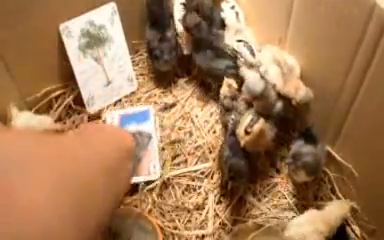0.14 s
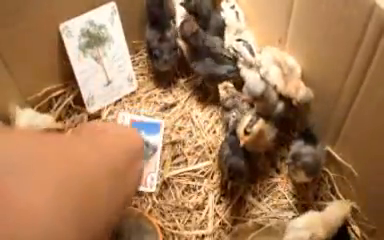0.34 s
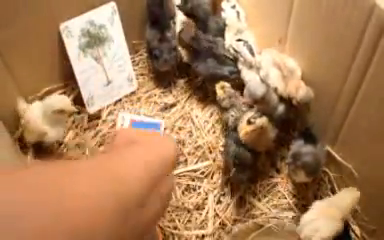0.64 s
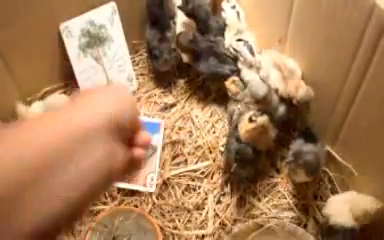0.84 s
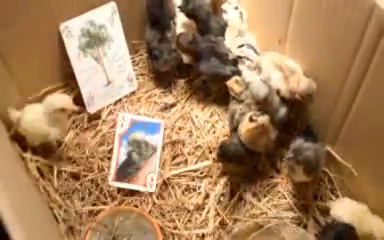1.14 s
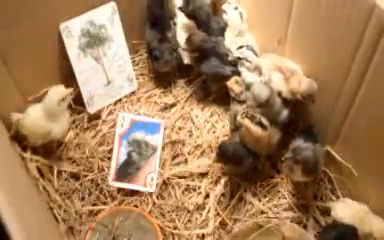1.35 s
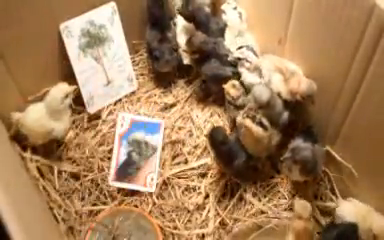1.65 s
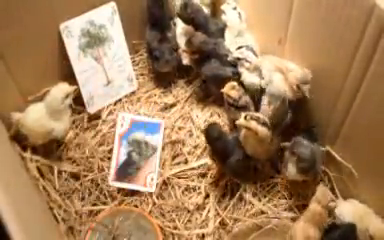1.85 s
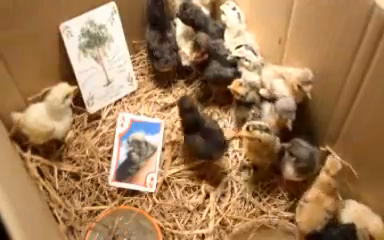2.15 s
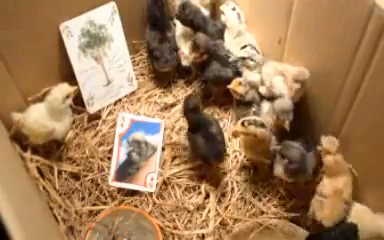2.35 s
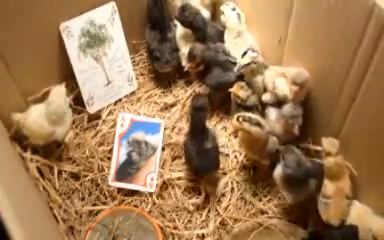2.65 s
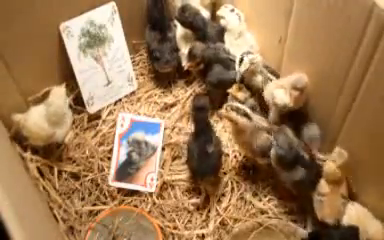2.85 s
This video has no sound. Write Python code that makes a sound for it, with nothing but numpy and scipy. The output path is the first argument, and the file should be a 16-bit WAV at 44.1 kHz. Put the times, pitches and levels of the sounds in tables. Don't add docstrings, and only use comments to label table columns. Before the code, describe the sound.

Chicks peep shrilly in a cardboard box indoors. A loud chick gives long, falling whistles at about 0.2, 0.65, 1.15, 1.6 and 2.35 s; a near neighbour answers shorter at 0.85, 1.45, 1.85, 2.15 and 2.6 s. Fainter peeps and low chirrs fill between. A firm knock with softer follow-up lands near 0.85 s, dull ones at 1.43 and 2.97 s. Low hum, hiss, thin camera sound.

```python
import sys
import numpy as np
from scipy import signal
from scipy.fft import rfft, irfft
from scipy.io import wavfile
from scipy.ndimage import uniform_filter1d

SR = 44100
rng = np.random.default_rng(int(sys.argv[2]) if len(sys.argv) > 2 else 0)


def ratio_of_db(decibels):
    return 10 ** (np.asarray(decibels, float) / 20)


def store_wav(level_fs):
    pcm = np.round(np.clip(np.atleast_2d(level_fs), -1, 1) * 32767)
    wavfile.write(sys.argv[1], SR, pcm.T.astype(np.int16))


N = 132300

# (f/Hz, level/dB)
FIZZ = [(9550, 0.5), (9700, -15.5), (11900, 1.5), (12100, -13), (15600, -12)]
# (low f/Hz, high f/Hz)
FIZZ_BANDS = [(8750, 9600), (9600, 12000), (12000, 15750)]


def read(points, hz):
    f, value = np.transpose(points)
    return np.interp(np.log(hz + 1), np.log(f + 1), value)


def evened(x):
    return x / np.sqrt(np.mean(x ** 2) + 1e-20)


def add(mix, s, sound):
    part = mix[round(s * SR):][:len(sound)]
    part += sound[:len(part)]


def band_noise(lo_hz, hi_hz):
    return signal.lfilter(*signal.butter(2, [lo_hz, hi_hz], "band", fs=SR), rng.standard_normal(N))


def patchy_noise(table, lo_hz, hi_hz, patch_db, patch_bins, patch_frames):
    frames, hz = N // 128 + 5, np.fft.rfftfreq(512, 1 / SR)
    a, b, patches = rng.standard_normal((3, len(hz), frames))
    patches = uniform_filter1d(patches, size=patch_bins, axis=0)
    patches = evened(uniform_filter1d(patches, size=patch_frames, axis=1))
    level_db = read(table, hz)[:, None] + patch_db * patches
    inside = ((hz > lo_hz) & (hz < hi_hz))[:, None]
    z = (a + 1j * b) * ratio_of_db(level_db) * inside
    return evened(signal.istft(z, nperseg=512, noverlap=384)[1][:N])


def hum():
    # (f/Hz, level/dB)
    tones = [(194, -62), (243, -57), (338, -66), (582, -65), (873, -64)]
    t, out = np.arange(N) / SR, np.zeros(N)
    for f, db in tones:
        waver = evened(uniform_filter1d(rng.standard_normal(N), size=8000))
        out += ratio_of_db(db + 4.3 * waver) * np.sin(2 * np.pi * f * t)
    return out


def hiss():
    # (f/Hz, level/dB)
    colour = [(18, -44), (30, -14), (109, -3), (163, -16.5), (238, -28.5), (409, -11.5), (3160, -12),
              (4950, -11), (8300, -6.5), (10800, -30), (18300, -120)]
    fizz_from_hz, whine_hz = FIZZ_BANDS[0][0], 7400
    rumble = ratio_of_db(-50.5) * evened(band_noise(40, 300))
    main = ratio_of_db(-40.5) * patchy_noise(colour, 90, fizz_from_hz, 3.2, 6, 25)
    fizz = ratio_of_db(-45.5) * patchy_noise(FIZZ, fizz_from_hz, SR, 1.0, 30, 20)
    whine = ratio_of_db(-48.5) * patchy_noise(colour, whine_hz - 250, whine_hz + 250, 3.1, 3, 30)
    return rumble + main + fizz + whine


def bumps():
    # (time/s, level/dB)
    thumps = [(.265, -34), (.74, -33.5)]
    t, width_s = np.arange(N) / SR, 0.012
    return sum(ratio_of_db(db) * np.exp(-((t - s) / width_s) ** 2) for s, db in thumps)


def knock(db, bright_db):
    # (f/Hz, level/dB, time to fall 60 dB/s)
    board = [(140, -4, 0.063), (324, -7, 0.043), (610, -7, 0.051), (1340, 2.5, 0.01), (2090, -3.5, 0.0088)]
    t = np.arange(0, .25, 1 / SR)
    ring = np.zeros(len(t))
    for f, level_db, t60 in board:
        tilt_db = bright_db * np.log2(f / 500)
        ring += ratio_of_db(level_db + tilt_db - 60 * t / t60) * np.sin(2 * np.pi * f * t)
    rattle = band_noise(120, 2200)[:len(t)] * ratio_of_db(-9 - 60 * t / .6)
    tick = ratio_of_db(-3 - 60 * t / .008) * rng.standard_normal(len(t))
    onset = np.minimum(t * 1400, 1)
    return ratio_of_db(db) * (onset * (ring / 2 + rattle) + tick)


def whistle(hz, partials_db, breath_db, breath_hz):
    turns = 2 * np.pi * np.cumsum(hz) / SR
    veil = signal.lfilter(*signal.butter(2, breath_hz, fs=SR), rng.standard_normal((2, len(hz))))
    veil = ratio_of_db(breath_db) * evened(veil)
    tone = np.zeros(len(hz))
    for k, db in enumerate(partials_db, 1):
        tone += ratio_of_db(db) * ((1 + veil[0]) * np.sin(k * turns) + veil[1] * np.cos(k * turns))
    i = np.arange(len(hz))
    edge = np.minimum(np.minimum(i, i[::-1]) / (0.001 * SR), 1)
    return edge * tone * np.sqrt(2)


def faint(length, top_hz, end_hz, db, second_db):
    arch_at, arch_hz = 0.208, 267
    u = np.arange(0, 1, 1 / (length * SR))
    rise = np.maximum(1 - u / arch_at, 0)
    sag = np.maximum(u - arch_at, 0) / (1 - arch_at)
    hz = top_hz - arch_hz * rise ** 2 + (end_hz - top_hz) * sag ** 1.15
    overtone_db = db + second_db - 30 * (hz > 4100)
    voice = whistle(hz, [db, overtone_db], breath_db=-12, breath_hz=130)
    return np.sin(np.pi * u) ** 0.5 * ratio_of_db(-5.0 * u) * voice


def huddle(mix):
    # (start/s, length/s, top f/Hz, end f/Hz, level/dB)
    faint_peeps = [(0.14, 0.033, 3350, 3150, -44.5), (0.164, 0.048, 5060, 5050, -27.5),
                   (.18, .006, 6000, 5130, -23), (0.177, 0.13, 3570, 3450, -30),
                   (0.631, 0.053, 3990, 2990, -20.5), (0.603, 0.055, 4795, 4450, -27),
                   (0.852, 0.055, 4860, 5120, -24), (0.964, 0.095, 3820, 3370, -33),
                   (1.116, 0.057, 4330, 3600, -44), (1.152, 0.044, 5580, 5000, -24),
                   (1.153, 0.027, 4580, 4300, -27), (1.176, 0.0427, 4780, 4210, -15),
                   (1.228, 0.041, 3450, 2667, -19), (1.415, 0.065, 5000, 4470, -42),
                   (1.455, 0.036, 5220, 5180, -30.5), (1.484, 0.026, 3820, 3420, -36),
                   (1.835, .03, 5170, 5080, -32), (2.165, .032, 5150, 5030, -27), (2.617, .03, 5150, 5050, -27),
                   (2.074, 0.077, 5680, 4400, -31), (2.325, 0.051, 5390, 4900, -30),
                   (1.609, .02, 5700, 5100, -23), (2.912, 0.086, 5620, 4530, -37.5)]
    # (start/s, level/dB)
    chirrs = [(0.229, -41.5), (0.373, -44), (0.464, -40), (0.554, -42), (0.659, -43), (1.164, -45.5),
              (1.334, -42), (2.036, -42.5), (2.154, -42.5), (2.709, -40.5), (2.801, -41.5)]
    for s, length, top_hz, end_hz, db in faint_peeps:
        add(mix, s, faint(length, top_hz, end_hz, db, second_db=-9))
    for s, db in chirrs:
        add(mix, s, faint(0.02544, 2034, 1240, db, second_db=-35))


def shrill():
    # (start/s, length/s, then level/dB in each of the three fizz bands)
    bursts = [(0.152, 0.068, -35.5, -47, -63), (.195, 0.15, -46, -35, -43), (0.658, 0.087, -45, -33, -37),
              (.895, 0.11, -41.5, -41, -57), (1.175, 0.15, -38, -73, -44), (1.5, 0.13, -36.5, -47, -47),
              (1.639, 0.17, -36, -42.5, -51), (1.825, 0.13, -41.5, -62, -57),
              (2.058, 0.089, -56, -43.5, -54), (2.196, 0.11, -39.5, -59, -55),
              (2.379, .093, -47.5, -44, -47), (2.614, 0.048, -33, -61, -62), (2.66, 0.11, -40.5, -63, -54),
              (2.846, 0.21, -57, -43.5, -62)]
    t, out = np.arange(N) / SR, np.zeros(N)
    for k, (lo, hi) in enumerate(FIZZ_BANDS):
        level = sum(ratio_of_db(dbs[k]) * ((t > s) & (t < s + length)) for s, length, *dbs in bursts)
        out += level * patchy_noise(FIZZ, lo, hi, 0.57, 30, 60)
    return out


def peep(rows, third_db):
    # (f/Hz, level/dB)
    beak = [(2000, -8.5), (3200, -4), (4800, 8), (6400, -3.5), (7300, -43), (8000, -10), (14000, -59)]
    glide = round(.0025 * SR)
    s, *columns = np.transpose(rows)
    t = np.arange(s[0], s[-1], 1 / SR)
    hz, first, second = (uniform_filter1d(np.interp(t, s, c), size=glide, mode="nearest")
                         for c in columns)
    third = second + third_db + read(beak, 3 * hz)
    return s[0], whistle(hz, [first, second, third], breath_db=-22, breath_hz=600)


def near_chicks(mix):
    # (time/s, pitch f/Hz, first partial level/dB, second level/dB)
    long_peeps = [
        [(0.18, 5078, -28, -52), (0.208, 4900, -11, -48), (0.224, 4716, -15, -36), (0.236, 3943, -9.5, -24.5),
         (0.247, 3307, -15.5, -10.5), (0.28, 3186, -19, -9.5), (0.297, 2945, -21, -12.5),
         (0.313, 2480, -30, -18.5), (0.333, 2020, -36, -29)],
        [(0.636, 4794, -19.5, -54), (0.664, 5010, -11, -55), (0.69, 4800, -21, -47), (0.699, 4455, -10, -47),
         (0.708, 3740, -22, -28), (0.72, 3320, -18, -11.5), (0.756, 3168, -24.5, -10),
         (0.785, 2540, -28.5, -12), (0.812, 2030, -46, -29.5)],
        [(1.153, 4869, -25, -50), (1.172, 5055, -8.5, -64), (1.204, 4595, -12.5, -43),
         (1.215, 3769, -20.5, -25.5), (1.232, 3302, -17, -15), (1.276, 3127, -25, -9.5),
         (1.295, 2801, -22.5, -11), (1.322, 2217, -42, -16.4), (1.336, 2010, -37, -25.5)],
        [(1.606, 4873, -23.5, -50), (1.626, 4972, -9, -55), (1.663, 4384, -9, -50), (1.672, 3554, -27, -28),
         (1.684, 3255, -18.5, -20), (1.722, 3117, -25, -13), (1.745, 2790, -25, -13.5),
         (1.775, 2225, -47, -16.5), (1.792, 1990, -48, -34)],
        [(2.347, 4460, -28, -46), (2.36, 4820, -9.5, -41), (2.393, 4397, -10.5, -44), (2.403, 3532, -27, -34),
         (2.418, 3202, -18.5, -17.5), (2.46, 2890, -27, -8.5), (2.475, 2662, -28, -12.5),
         (2.492, 2187, -47, -17), (2.512, 2075, -46.0, -33)],
    ]
    # (time/s, pitch f/Hz, first partial level/dB, second level/dB)
    short_peeps = [
        [(0.85, 5153, -33.1, -55), (0.868, 5380, -17, -55), (0.897, 4820, -20.5, -53),
         (0.908, 4080, -12.1, -28), (0.925, 3576, -16.5, -27), (0.94, 3273, -20.5, -25.5),
         (0.952, 2980, -25.5, -31.5), (0.962, 2700, -35, -38)],
        [(1.46, 4323, -28.5, -56.4), (1.487, 4980, -15, -55), (1.519, 4685, -15.5, -58),
         (1.526, 4420, -8.5, -55), (1.53, 3656, -20.5, -36), (1.549, 3403, -14.5, -25),
         (1.572, 2880, -25, -24.5), (1.588, 2760, -35.7, -36)],
        [(1.834, 4289, -31.5, -56.7), (1.865, 4963, -14.5, -55), (1.894, 4640, -11.5, -55),
         (1.901, 4430, -10.0, -52), (1.906, 3573, -22, -33), (1.925, 3380, -14.5, -24), (1.95, 2767, -28, -21),
         (1.968, 2580, -41, -35)],
        [(2.16, 4276, -35, -58), (2.196, 4830, -12.5, -57), (2.222, 4565, -14, -55), (2.237, 4220, -8, -58.0),
         (2.241, 3310, -19.5, -22), (2.253, 3277, -13, -22), (2.272, 2800, -25.5, -20.5),
         (2.295, 2370, -38, -29)],
        [(2.617, 4315, -37, -56), (2.648, 4884, -15, -57), (2.679, 4570, -11.5, -55), (2.688, 4083, -11.5, -65),
         (2.693, 3355, -19.5, -23), (2.71, 3246, -15, -23), (2.733, 2780, -25.5, -20.5),
         (2.757, 2463, -42.4, -32)],
    ]
    for rows in long_peeps:
        add(mix, *peep(rows, third_db=-6))
    for rows in short_peeps:
        s, sound = peep(rows, third_db=-25)
        add(mix, s, sound)
        add(mix, s + .0042, ratio_of_db(-12) * sound)


def box(x):
    # (delay/s, level/dB)
    echoes = [
        (.0016, -20),
        (.0034, -15),
        (.0061, -15),
    ]
    # (f/Hz, level/dB)
    tail_colour = [(1500, -0.5), (2500, 3), (3200, 4), (4000, -1.5), (4700, 0.5), (5800, -4.5),
                   (7500, -3.5)]
    tail_db, t60 = -16.5, 0.35
    taps = np.zeros(SR // 2)
    t = np.arange(len(taps)) / SR
    at = np.arange(300, len(taps) - 20, 20)
    taps[at + rng.integers(0, 20, len(at))] = rng.choice([-1., 1.], len(at))
    taps *= ratio_of_db(-60 * t / t60)
    hz = np.fft.rfftfreq(len(taps), 1 / SR)
    taps = irfft(rfft(taps) * ratio_of_db(read(tail_colour, hz)), len(taps))
    taps *= ratio_of_db(tail_db) / np.linalg.norm(taps)
    taps[0] = 1
    for s, db in echoes:
        taps[round(s * SR)] += ratio_of_db(db)
    return signal.fftconvolve(x, taps / np.linalg.norm(taps))[:N]


def scene():
    # (time/s, level/dB, brightness/dB per octave)
    knocks = [
        (.846, -16.5, 2.5),
        (.884, -22, 4),
        (1.43, -28, 0),
        (2.965, -26.5, 3),
    ]
    near = np.zeros(N)
    for s, db, bright_db in knocks:
        add(near, s, knock(db, bright_db))
    huddle(near)
    near_chicks(near)
    level_db = 10 * np.log10(abs(uniform_filter1d(near ** 2, size=4000)) + 1e-9)
    duck = ratio_of_db(-0.53 * np.maximum(level_db + 17.5, 0))
    return (box(near) + (hum() + hiss()) * duck + bumps() + shrill())[None]


def roll_off(x):
    return signal.sosfilt(signal.butter(12, 16680, fs=SR, output="sos"), x)


def record(dry):
    gap_hz = 8380
    hz, t, z = signal.stft(dry[0], SR, nperseg=512, noverlap=384)
    block = ((t - .007) * SR // 1024 + 1).astype(int)
    a, b = rng.standard_normal((2, *z.shape))
    chance = rng.standard_normal((block[-1] + 2, len(FIZZ_BANDS)))
    lucky = rng.random((block[-1] // 2 + 2, 64))
    out = z * (ratio_of_db(-25 * (hz > gap_hz)) * (hz < FIZZ_BANDS[0][0]))[:, None]

    count = np.maximum(np.bincount(block), 1)
    for k, (lo, hi) in enumerate(FIZZ_BANDS):
        inside = (hz >= lo) & (hz < hi)
        power = np.bincount(block, (abs(z[inside]) ** 2).mean(0)) / count
        level = np.sqrt(power / 2)[block] * ratio_of_db(2 * chance[block // 2, k])
        out[inside] = (a + 1j * b)[inside] * level

    power = abs(out) ** 2
    loudness = uniform_filter1d(power.sum(0), size=24)
    quiet = uniform_filter1d(power, size=5, axis=0) < ratio_of_db(-50) * loudness
    band = (12 * np.log2(1 + hz / 1500)).astype(int)
    share = .075 * (1 + 2 * (hz > 6000) + 4 * (hz > 7700))
    reach = (hz > 1200) & (hz < gap_hz)
    hole = quiet & (lucky[block // 4][:, band].T < share[:, None]) & reach[:, None]
    out = out * ratio_of_db(-26 * uniform_filter1d(1. * hole, size=4, axis=1))
    mix = signal.istft(out, SR, nperseg=512, noverlap=384)[1][None, :N]
    return roll_off(mix)


dry = scene()
out = record(dry)
store_wav(out)
```